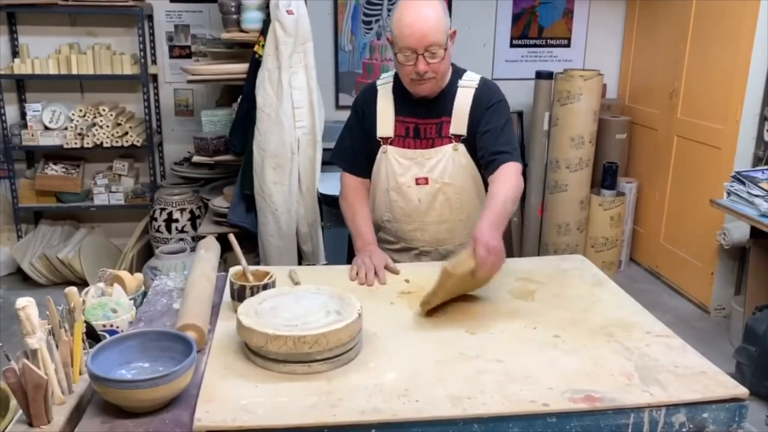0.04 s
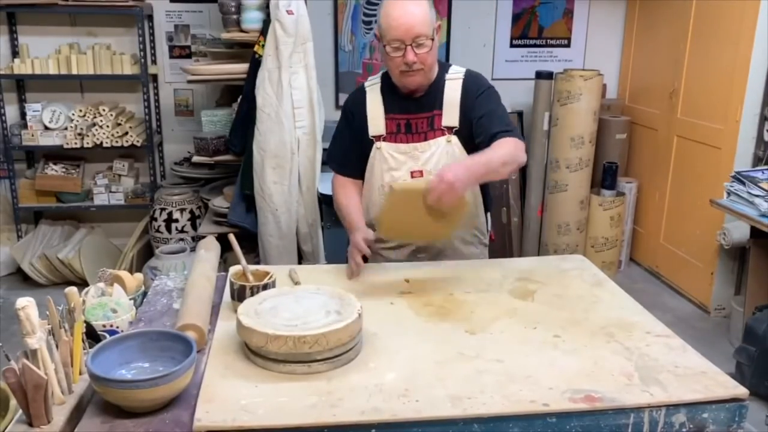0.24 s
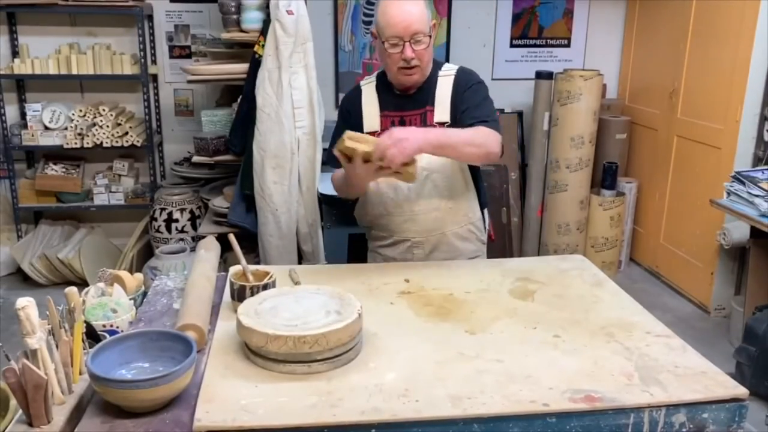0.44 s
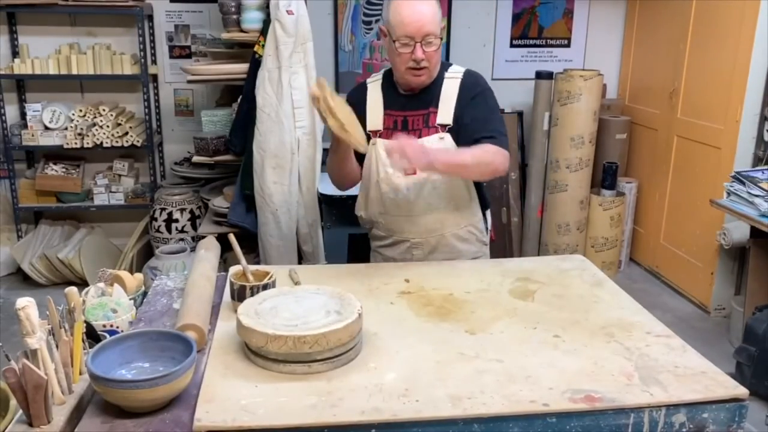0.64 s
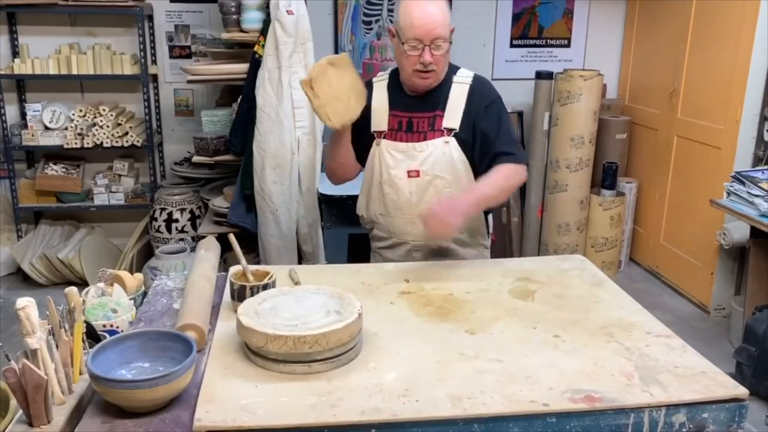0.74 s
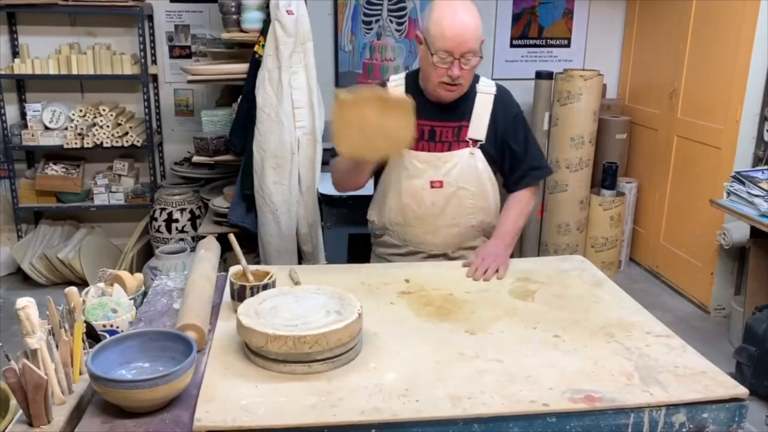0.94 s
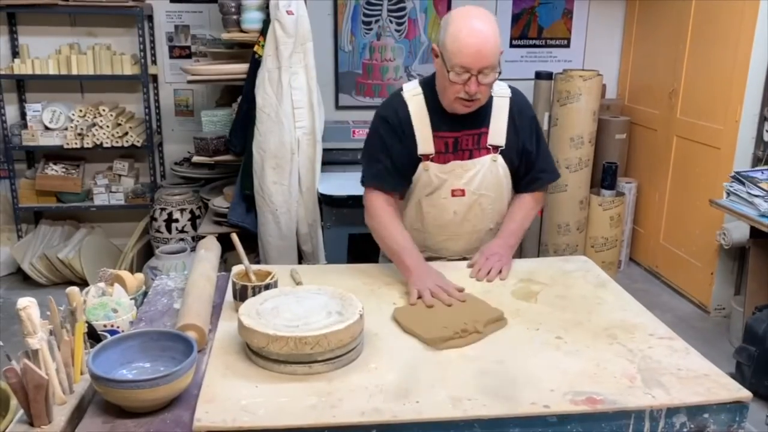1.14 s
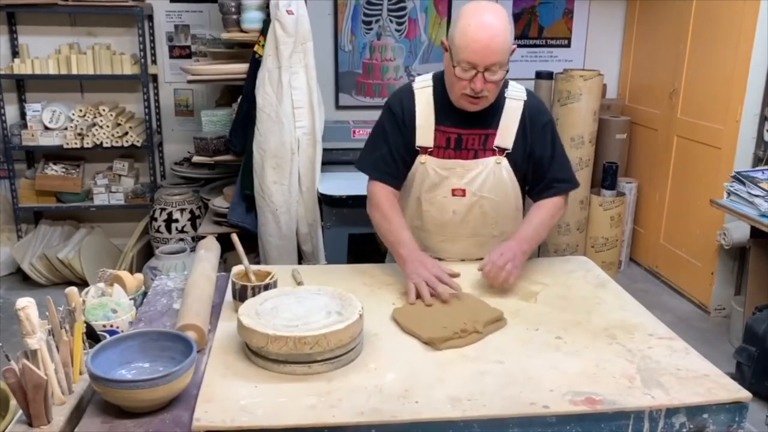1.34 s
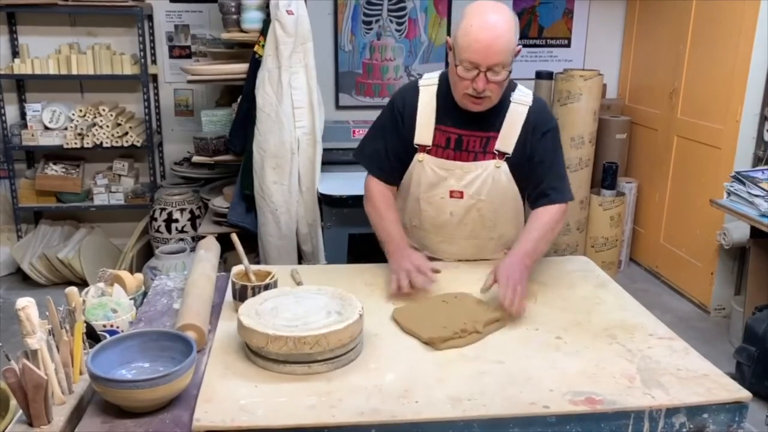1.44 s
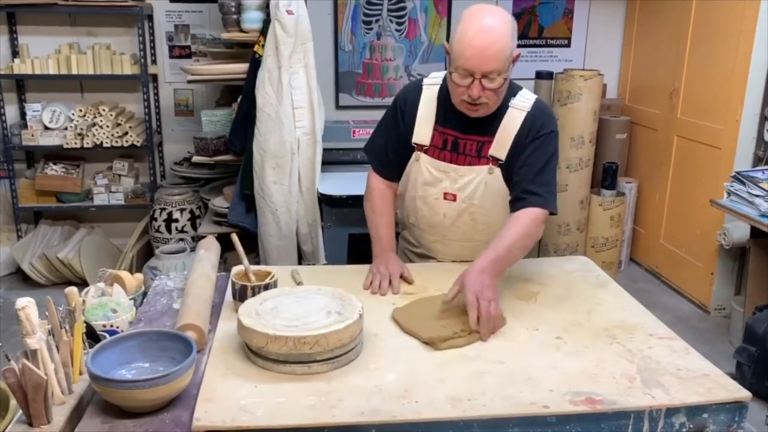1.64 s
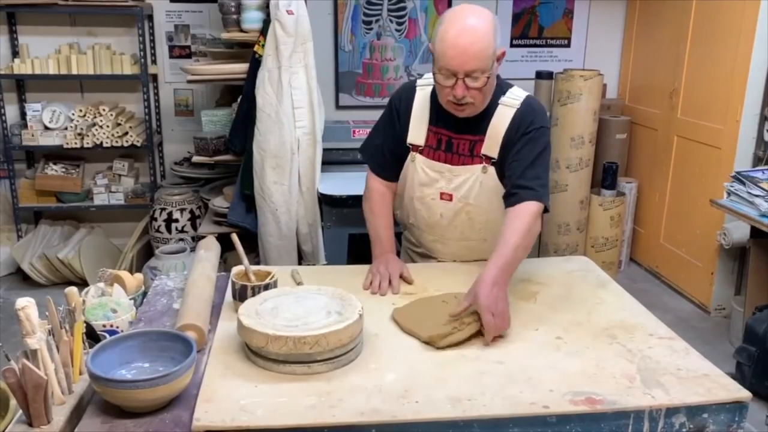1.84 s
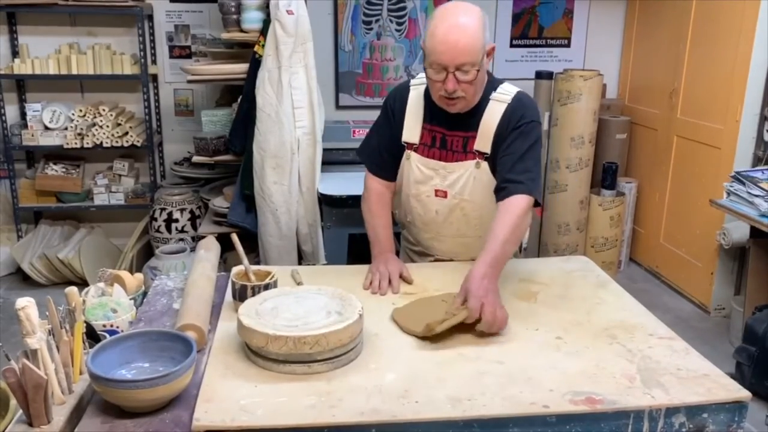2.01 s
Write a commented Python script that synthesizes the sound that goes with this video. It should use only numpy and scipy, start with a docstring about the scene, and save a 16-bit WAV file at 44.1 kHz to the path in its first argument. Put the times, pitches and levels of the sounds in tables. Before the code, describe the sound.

A slab of wet clay slams onto a wooden table with a sharp slap and boom.

```python
"""In a small studio, a slab of wet clay is lifted, passed from hand to hand and slammed on a wooden table.
Sleeves rustle, a palm catches the clay, and air rushes ahead of the fall. The edge cracks down first and
the rest slaps on over some 25 ms; the table booms, things on it chatter and the room rings on.
The slab shifts on the wood, and fingers peel it up again with a sticky smack."""
import sys
import numpy as np
from scipy import signal
from scipy.fft import rfft, irfft, next_fast_len
from scipy.io import wavfile
from scipy.ndimage import uniform_filter1d

SR = 44100
rng = np.random.default_rng(int(sys.argv[2]) if len(sys.argv) > 2 else 0)


def pcm_store(signal):
    """Save signal as 16-bit PCM."""
    levels = np.round(np.clip(np.atleast_2d(signal), -1, 1) * 32767)
    wavfile.write(sys.argv[1], SR, levels.astype(np.int16).T)


N = 91375
T = np.arange(N) / SR
SIZE = next_fast_len(2 * N + 2, True) // 2 * 2
HZ = np.maximum(np.arange(SIZE // 2 + 1) * SR / SIZE, 10)
LAND_S = 1.1415   # the slab's edge meets the table


def from_db(db):
    """Decibels to gain."""
    return 10 ** (np.asarray(db) / 20)


def rms_one(x):
    """Scale to unit power."""
    return x / np.sqrt(np.mean(x ** 2) + 1e-20)


def at_hz(points, hz):
    """Read a curve on a log-frequency axis."""
    freqs, values = np.transpose(points)
    return np.interp(np.log(hz), np.log(freqs), values)


def colour(x, tone, tilt_db=0):
    """Minimum-phase EQ, tilted by tilt_db per octave above 500 Hz; white noise keeps its power."""
    gain = rms_one(from_db(at_hz(tone, HZ) + tilt_db * np.log2(np.maximum(HZ, 500))))
    cepstrum = irfft(np.log(gain + 1e-9))
    cepstrum[1:SIZE // 2] *= 2
    cepstrum[SIZE // 2 + 1:] = 0
    return irfft(rfft(x, SIZE) * np.exp(rfft(cepstrum)))[..., :N]


def hiss(wide_above_hz=5956):
    """Stereo noise, centred in the bass and wide in the treble."""
    mid, side = rng.standard_normal((2, N))
    side = signal.sosfilt(signal.butter(1, wide_above_hz, "high", fs=SR, output="sos"), side)
    return rms_one(mid + side * [[1], [-1]])


def burst(start, length):
    """A contact: noise of unit power while the surfaces close."""
    progress = np.clip((T - start) / length, 0, 1)
    x = hiss() * np.sqrt(np.abs(np.sin(np.pi * progress)))
    energy = np.mean(np.sum(x ** 2, axis=1))
    return x * np.sqrt(length * SR / (energy + 1e-12))


def ring(t, hz, t60, swell, sag_per_s=0):
    """A mode swells as it takes the load, then dies away; its pitch may sag."""
    t = np.maximum(t, 0)
    attack = np.sin(np.pi / 2 * np.minimum(t / swell, 1))
    decay = np.exp(-np.log(1000) * np.maximum(t - swell, 0) / t60)
    return attack * decay * np.sin(2 * np.pi * hz * t * (1 - sag_per_s * t / 2))


def smack(contacts, tone, pockets, pop_s):
    """Skin meets sticky clay; air pockets between them pop and ring, sinking in pitch as they open."""
    skin = sum(from_db(db) * colour(burst(start, length), tone, tilt)
               for start, length, db, tilt in contacts)
    pops = sum(from_db(db) * ring(T - pop_s, hz, t60, swell, sag_per_s=5.4)
               for hz, db, t60, swell in pockets)
    return skin + pops


def room_tone(level_db=-68.5):
    """A quiet, bass-heavy bed of noise."""
    # The still room's spectrum. Each row: frequency in Hz, relative level in dB.
    tone = [(25, -27.5), (80, -3), (170, -21), (300, -22.5), (500, -27), (2000, -38), (8500, -42),
            (16000, -36.5)]
    return from_db(level_db) * colour(hiss(), tone)


def brushes(grain_db=2, grain_s=0.001):
    """Grainy friction of sleeves and palms rises and falls with each move."""
    # Strokes. Each row: peak time, rise and fall in seconds, level in dB, tilt in dB per octave.
    strokes = [(0.089, 0.064, 0.06, -69.5, -5), (0.421, 0.04, 0.04, -68, -7.5),
               (0.497, 0.013, 0.0088, -59.5, 1.5), (.69, 0.022, 0.05, -65.5, 1),
               (0.775, 0.034, 0.036, -57, -1), (0.934, .012, 0.06, -62, 0), (1.001, .03, 0.14, -72, -4),
               (1.607, 0.03, 0.076, -63, 0), (1.673, 0.02, 0.021, -55, 2.5), (1.892, 0.059, 0.079, -65, -2),
               (2.04, 0.1, 0.06, -62.5, -6.5)]
    # Soft cloth and skin. Each row: frequency in Hz, relative level in dB.
    tone = [(80, -7.5), (235, 7), (450, -1), (800, 1.5), (1900, -1), (4000, -7), (7000, -19.5),
            (16000, -19)]
    grain_index = (T / grain_s).astype(int)
    rustle = 0
    for peak, rise, fall, db, tilt in strokes:
        envelope = np.exp(-np.where(T < peak, ((T - peak) / rise) ** 2, (T - peak) / fall))
        friction = hiss()
        roughness = from_db(grain_db * np.minimum(rng.exponential(1, N), 4))
        grains = rms_one(friction * roughness[grain_index])
        rustle = rustle + from_db(db) * colour(grains * envelope, tone, tilt)
    return rustle


def peel():
    """Fingers peel the slab off the wood: a faint tick at first, a sticky smack after the slam."""
    # Finger grips. Each row: start and length in seconds, level in dB, tilt in dB per octave.
    contacts = [(.051, 0.0043, -61, 3.5), (1.9385, 0.0043, -38, -1), (1.945, 0.01, -48.5, -6.5)]
    # Tacky skin. Each row: frequency in Hz, relative level in dB.
    tone = [(100, 0.5), (350, 5.5), (1300, -0.5), (2600, 1), (4200, 5.5), (5200, -7), (6800, 0.5),
            (8600, -14.5), (15000, 0.5)]
    # Air pockets. Each row: pitch in Hz, level in dB, T60 and swell in seconds.
    pockets = [(897, -41, .042, .004), (1800, -41.5, 0.014, 0.0021)]
    return smack(contacts, tone, pockets, pop_s=1.939)


def nudges():
    """Light pushes from hands and clay stir the table's lowest modes."""
    # Pushes. Each row: start in seconds, level in dB.
    pushes = [(0.069, -48.5), (0.421, -53), (0.503, -51.5), (1.023, -49), (1.965, -46)]
    # Hand-damped table modes. Each row: pitch in Hz, relative level in dB, T60 in seconds.
    modes = [(75, -3, .13), (94, -8, 0.18), (135, -13, 0.33), (217, -21, 0.25)]
    return sum(from_db(db + mode_db) * ring(T - start, hz, t60, swell=0.014)
               for start, db in pushes for hz, mode_db, t60 in modes)


def taps(length_s=0.0039):
    """Fingertips touch down softly."""
    # Touches. Each row: start in seconds, level in dB.
    touches = [(.386, -57), (1.7967, -48)]
    # A dull fingertip. Each row: frequency in Hz, relative level in dB.
    tone = [(100, 4), (800, -2), (1450, -1), (2200, -22), (16000, -45)]
    return colour(sum(from_db(db) * burst(start, length_s) for start, db in touches), tone)


def catch():
    """The slab lands in the other palm with a small wet smack."""
    # Palm contacts. Each row: start and length in seconds, level in dB, tilt in dB per octave.
    contacts = [(.5006, 0.01, -32, 0.6), (.5022, 0.0031, -28.5, 4)]
    # Clay on skin. Each row: frequency in Hz, relative level in dB.
    tone = [(80, 0.5), (200, 5.5), (380, 2.5), (650, -6), (1200, 0), (2000, 1), (2800, -1), (5000, -1),
            (6800, 5), (8600, -8.5), (11000, 4.5), (16000, -4.5)]
    # Air pockets. Each row: pitch in Hz, level in dB, T60 and swell in seconds.
    pockets = [(350, -44, 0.023, 0.00075), (1188, -40.5, .015, .001), (1948, -35.5, 0.035, .001)]
    return smack(contacts, tone, pockets, pop_s=0.5003)


def air(peak_db=-38.5, rise_db_per_s=1298.5):
    """Air pushed ahead of the falling slab swells until it lands."""
    # A low whoosh. Each row: frequency in Hz, relative level in dB.
    tone = [(30, -12), (100, -5.5), (250, -12), (800, -17), (3000, -12.5), (7000, -21), (16000, -47.5)]
    swell = from_db(peak_db - rise_db_per_s * np.abs(LAND_S - T)) * (T < LAND_S)
    return colour(hiss() * swell, tone)


def slap():
    """Wet clay closes on the wood, part after part, and squeezes the air out."""
    # Clay hits. Each row: start and length in seconds, level in dB, tilt in dB per octave.
    hits = [(1.1416, 0.0011, -12.5, 0.36), (1.1431, 0.011, -17, -1.5), (1.151, 0.013, -18, -0.5),
            (1.1574, 0.0018, -6.5, -4), (1.162, 0.0038, -9.5, -0.6), (1.1656, 0.007, -17.5, -4)]
    # The wet crack. Each row: frequency in Hz, relative level in dB.
    tone = [(60, -7.5), (200, -2.5), (520, -1.5), (780, -5.5), (1200, -1), (1650, 4), (2500, -7),
            (3800, -3.5), (5000, -14), (6800, -4.5), (8600, -20.5), (10500, -6), (13000, -22.5),
            (15500, -15.5)]
    return sum(from_db(db) * colour(burst(start, length), tone, tilt) for start, length, db, tilt in hits)


def boom(spread_s=0.0004):
    """Low modes swell under the slab and ring on, each reaching one side just before the other."""
    # Table and room modes. Each row: pitch in Hz, level in dB, T60 and swell in seconds.
    modes = [(72, -14.5, .22, 0.026), (70.8, -26.5, 1.5, 0.04), (84.86, -26.5, 1.34, 0.1),
             (104.6, -36.5, 1.44, .1), (135.3, -13, 0.22, 0.07), (133.5, -32.5, 1.6, .08),
             (172, -26, .25, 0.012), (198, -16.5, .08, .005), (210.5, -21.5, 0.47, .045),
             (230.8, -21.5, 0.45, 0.05), (256.4, -26, 0.52, 0.063), (288.3, -23.5, 0.39, 0.06),
             (487, -26, 0.18, 0.028), (520.5, -25, 0.22, 0.025), (563, -28, .35, .025)]
    lead = np.array([[0.5], [-0.5]]) * spread_s
    return sum(from_db(db) * ring(T - LAND_S + lead * (-1) ** k, hz, t60, swell)
               for k, (hz, db, t60, swell) in enumerate(modes))


def rumble(level_db=-26.5, swell_s=0.06, t60_s=1.43):
    """The table's legs and the room's crowded bass modes rumble on as a fading band of noise."""
    # The low tail. Each row: frequency in Hz, relative level in dB.
    tone = [(30, -35.5), (58, -11.5), (88, 3.5), (110, -7), (145, -8.5), (210, -16), (330, -24), (500, -42),
            (1500, -71.5)]
    t = np.maximum(T - LAND_S, 0)
    noise = colour(hiss(), tone)
    running_power = uniform_filter1d(np.mean(noise ** 2, axis=0), size=SR // 8)
    steady = noise / np.sqrt(running_power + 1e-12)
    envelope = np.minimum(t / swell_s, 1) * np.exp(-np.log(1000) * t / t60_s)
    return from_db(level_db) * steady * envelope


def thud():
    """The slab's weight arrives in stages and shakes the whole frame."""
    # Edge, middle, then settling. Each row: start and length in seconds, level in dB.
    stages = [(1.1425, .012, -19.5), (1.157, .016, -20.5), (1.186, .035, -23)]
    # The body of the hit. Each row: frequency in Hz, relative level in dB.
    tone = [(40, -30), (70, -1), (130, 2.5), (200, 1.5), (290, 1.5), (400, -14.5), (520, -7), (800, -21.5),
            (2000, -36.5)]
    return sum(from_db(db) * rms_one(colour(burst(start, length), tone)) * np.sqrt(length * SR / N)
               for start, length, db in stages)


def chatter(start_s=1.165, swing_hz=130.35, t60_s=0.3, level_db=-21):
    """Things on the table jump and knock once per swing of its top."""
    # A midrange rattle. Each row: frequency in Hz, relative level in dB.
    tone = [(150, -15), (500, 1), (800, -6), (1400, -7.5), (2500, -22), (6000, -29.5), (16000, -47)]
    t = np.maximum(T - start_s, 0)
    knocks = rms_one(np.maximum(np.sin(2 * np.pi * swing_hz * t), 0) ** 2)
    decay = np.exp(-np.log(1000) * t / t60_s)
    return from_db(level_db) * colour(hiss() * knocks * decay, tone)


def drag(start_s=1.574, length_s=0.15, note_hz=480, level_db=-68):
    """The damp slab shifts, rubbing on the wood with a hollow note."""
    hollow = [(note_hz / 2, -40), (note_hz, 0), (note_hz * 2, -40)]
    return from_db(level_db) * colour(burst(start_s, length_s), hollow)


def studio(x, predelay_s=0.0017, build_s=0.002, tilt_db_per_octave=-1.7):
    """Diffuse reverb: each band dies at its own rate, and the bass stays centred."""
    # The room's decay. Each row: frequency in Hz, T60 in seconds.
    decay_times = [(60, 0.5), (130, 0.99), (250, 0.52), (500, .45), (1200, 0.36), (3000, .38), (7000, 0.31),
                   (15000, 0.23)]
    centres = np.geomspace(50, 16000, 14)
    mid, side = rfft(rng.standard_normal((2, N)), SIZE)
    width = HZ ** 2 / (HZ ** 2 + 150 ** 2)
    rolloff = from_db(tilt_db_per_octave * np.log2(np.maximum(HZ / 1000, 1)))
    spectrum = (mid + width * side * [[1], [-1]]) / np.sqrt(1 + width ** 2) * rolloff
    t = np.maximum(T - predelay_s, 0)
    tail = 0
    for hz, share in zip(centres, np.eye(len(centres))):
        rate = np.log(1000) / at_hz(decay_times, hz)
        band = irfft(spectrum * np.interp(np.log(HZ), np.log(centres), share))[:, :N]
        tail = tail + band * np.exp(-rate * t) * np.sqrt(2 * rate / SR)
    response = tail * (1 - np.exp(-t / build_s))
    return irfft(rfft(x, SIZE) * rfft(response, SIZE))[:, :N]


def scene():
    """Contacts play direct and through the reverb; low ringing, air and room tone bypass it."""
    # Each pair: sound, reverb send in dB.
    sources = [(slap(), -2.6), (thud() + chatter(), -1), (taps(), 2),
               (brushes() + drag(), 1.5), (catch(), 2), (peel(), 0.5)]
    direct = sum(sound for sound, _ in sources)
    reverb = studio(sum(sound * from_db(send_db) for sound, send_db in sources))
    return direct + reverb + room_tone() + boom() + rumble() + air() + nudges()


def record(dry, low_cut_hz=40, ceiling=0.88, high_cut_hz=16200):
    """The microphone sheds the deepest bass; peaks are soft-clipped and the very top is cut."""
    x = signal.sosfilt(signal.butter(2, low_cut_hz, "high", fs=SR, output="sos"), dry)
    rounded = x / (1 + (x / ceiling) ** 6) ** (1 / 6)
    return signal.sosfilt(signal.ellip(10, 0.1, 80, high_cut_hz, fs=SR, output="sos"), rounded)


dry = scene()
out = record(dry)
pcm_store(out)
```